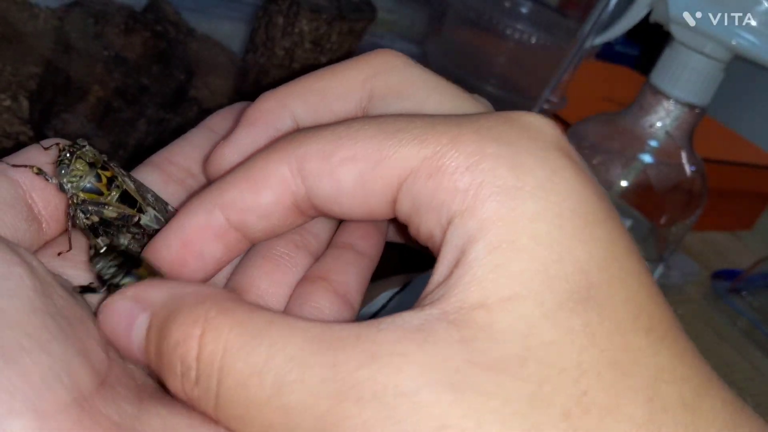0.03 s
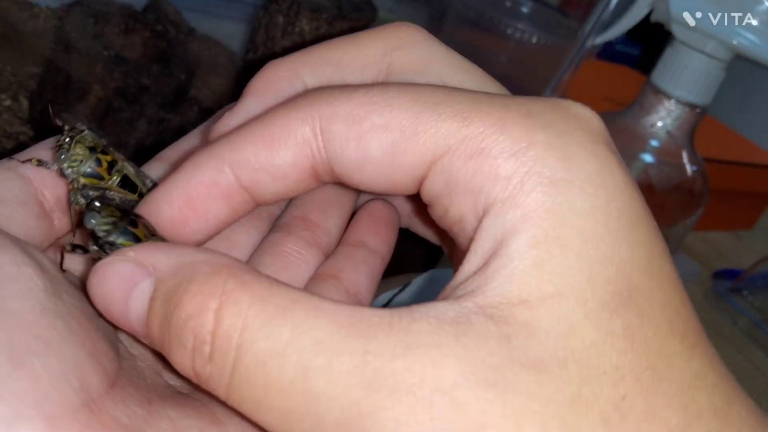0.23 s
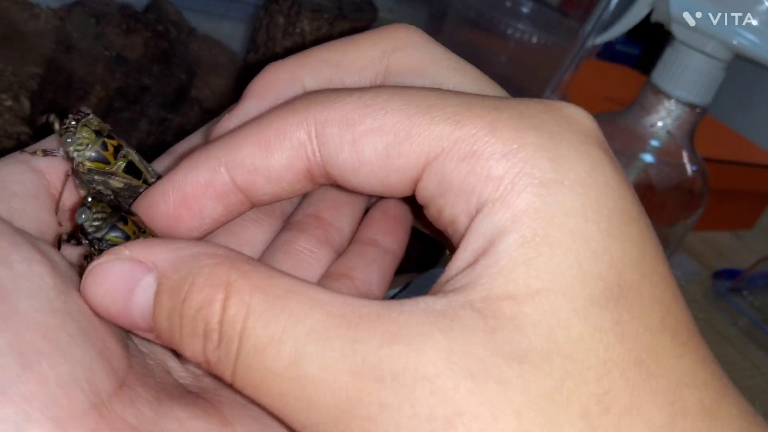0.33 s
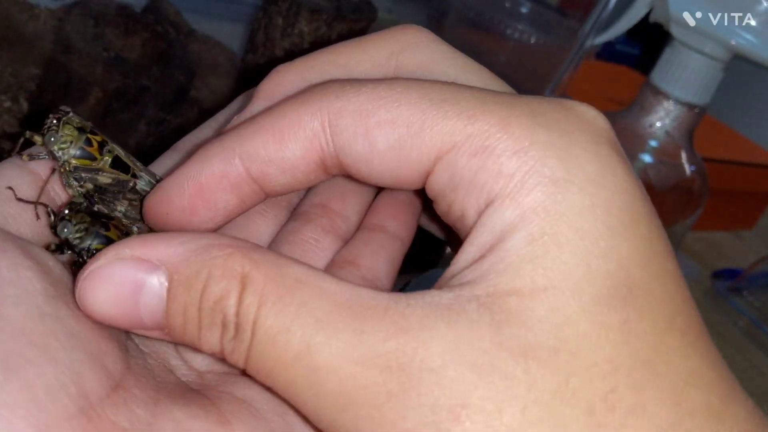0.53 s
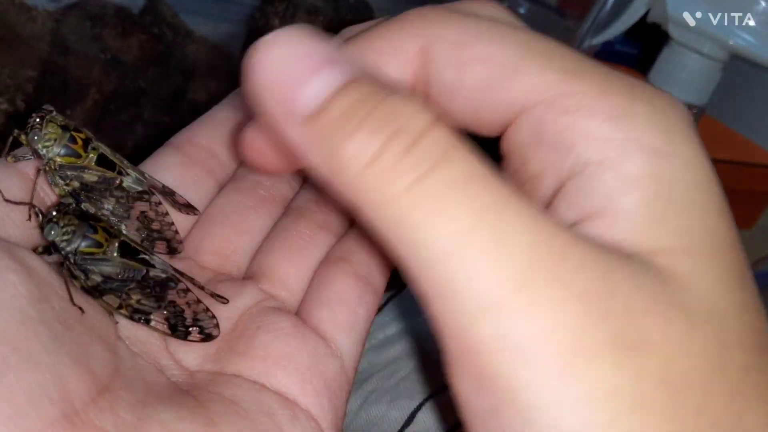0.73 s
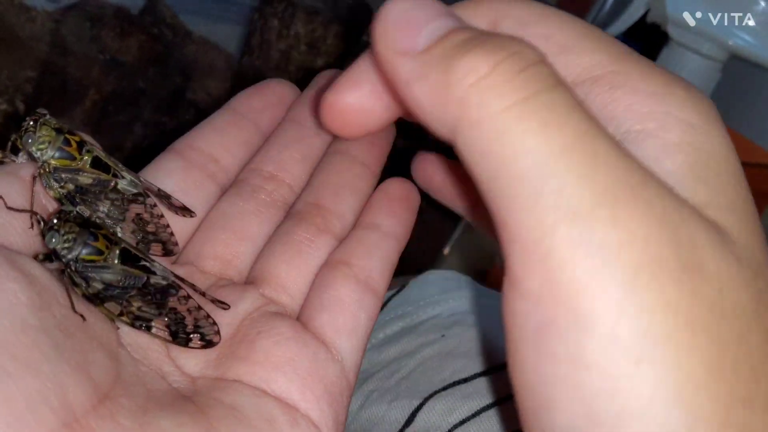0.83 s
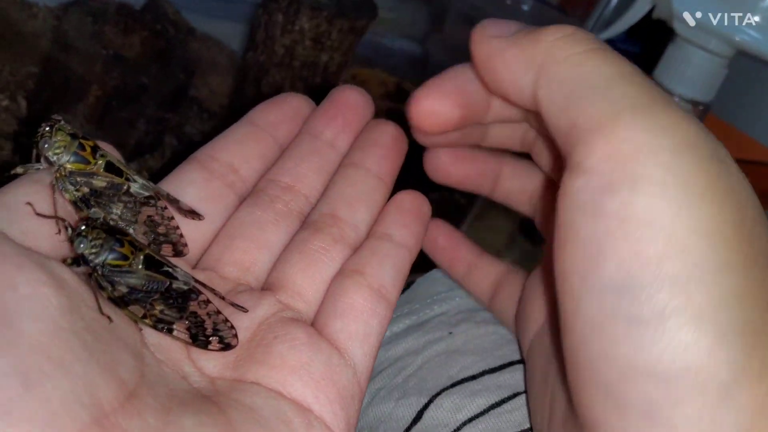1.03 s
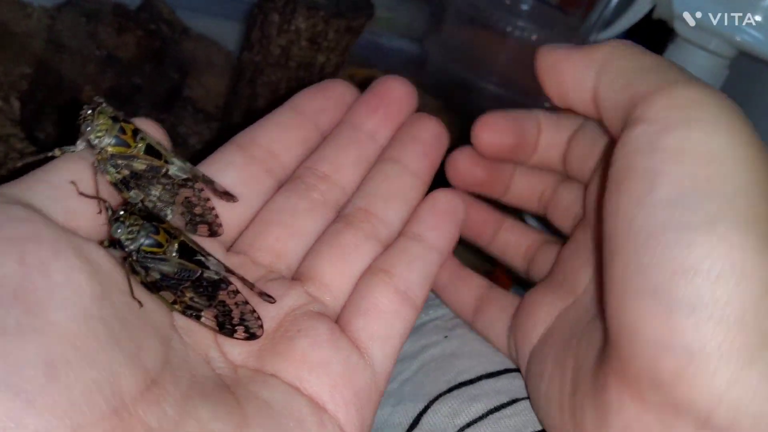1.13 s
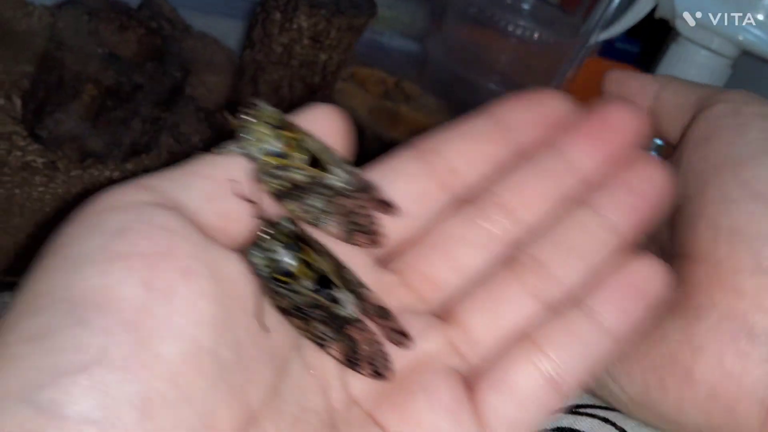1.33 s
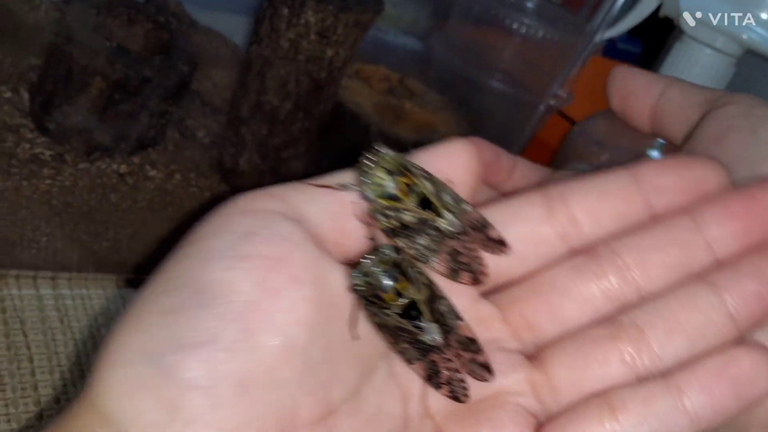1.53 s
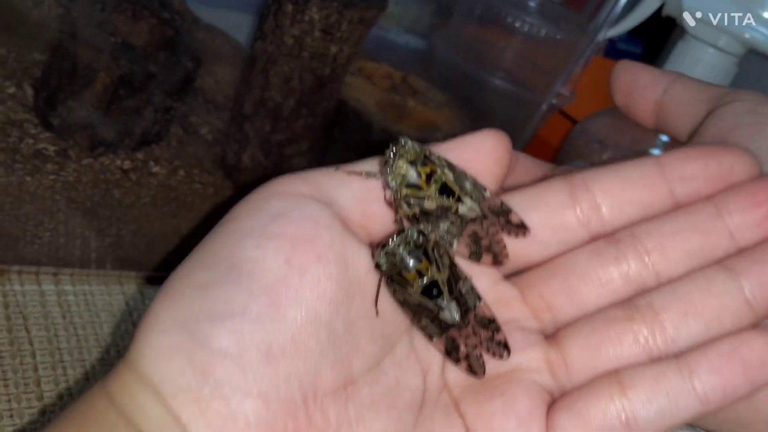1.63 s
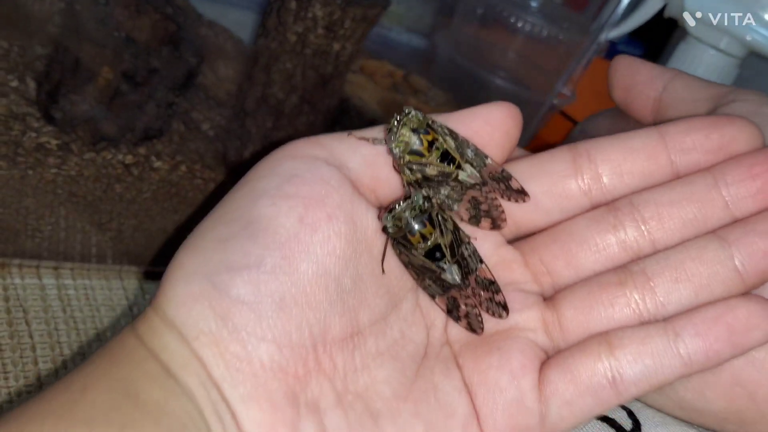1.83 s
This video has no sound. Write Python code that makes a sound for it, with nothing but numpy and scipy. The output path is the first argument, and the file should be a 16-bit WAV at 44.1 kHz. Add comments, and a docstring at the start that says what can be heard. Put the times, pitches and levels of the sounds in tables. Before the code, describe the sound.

A cicada gives short shrill chirps and one harsh buzz, close up over a low hum.

```python
"""One long harsh buzz among short chirps: a cicada held in the palm protests, close up in a small room.
Each muscle stroke buckles a tymbal and lets it spring back, two clicks that ring in the hollow abdomen.
A few faint ticks fall around the calls. Near the end a soft rubbing hiss swells on the left as the
hands move. Behind it all an appliance hums over the room's low rumble."""
import sys
import numpy as np
from scipy import signal
from scipy.fft import rfft, irfft
from scipy.io import wavfile
from scipy.ndimage import uniform_filter1d, minimum_filter1d

SR = 44100
rng = np.random.default_rng(int(sys.argv[2]) if len(sys.argv) > 2 else 0)


def transcribe(signal):
    """Save signal, clipped to [-1, 1], as a 16-bit WAV file at the path in sys.argv[1]."""
    frames = np.atleast_2d(signal).T
    limited = np.clip(frames, -1, 1)
    pcm = np.round(limited * 32767).astype(np.int16)
    wavfile.write(sys.argv[1], SR, pcm)


N = 83790
LEAD = SR // 10   # samples of pre-roll, so a chirp can start before time zero


def tymbal(times, level_db, tuning, bright_db, top_ring, max_strokes=80, size=300):
    """Two stereo clicks a stroke: each swells and dies in the body's modes as the ribs crackle."""
    # tymbal and abdomen modes: (pitch [Hz], decay [ms], buckling level [dB], spring-back level [dB])
    body_modes = [(4760, 0.25, -19.5, -20.5), (5533, 0.84, -10, -14), (6376, 0.47, 0, -10),
                  (7180, 0.65, -19.5, -5.5), (8690, 0.2, -10.5, 0), (9820, 0.74, -16, -8.5),
                  (12050, 0.45, -17, -24.5)]
    top_hz, top_ms, top_db = 15450, .5, -15   # an optional glassy ring of steady pitch
    rebound_s, rebound_spread_s, jitter_s, path_spread_s = .0013, .00027, .00012, .000016
    click_spread_db, mode_spread_db, pitch_spread = 1.3, 1.6, .017
    crackle_db, crackle_decay_s = -14, .001
    body_low_hz, thorax_band_hz, thorax_db = 4185, [1950, 3050], -26
    out, t = np.zeros((2, N + LEAD)), np.arange(size) / SR
    hz, decay_ms, *click_db = np.transpose(body_modes + [(top_hz, top_ms, top_db, top_db)])
    upper = np.arange(len(hz)) > np.argmax(click_db[0])   # these follow brightness, the rest tuning
    per_click = rng.standard_normal((max_strokes, 2, 2))
    per_mode = rng.standard_normal((max_strokes, 2, 4, len(hz), 1))
    crackle = rng.standard_normal((max_strokes, 2, 2, size))
    crackle *= from_db(crackle_db) * np.exp(-t / crackle_decay_s)
    age = t / (decay_ms[:, None] / 1000)
    envelope = age * np.exp(1 - age)
    for k, start in enumerate(times[:max_strokes]):
        start = start + jitter_s * per_click[k, 0, 0]
        rebound = rebound_s + rebound_spread_s * per_click[k, 1, 0]
        for click, delay in enumerate((0, rebound)):
            detune, strength, phase, path = per_mode[k, click]
            pitch = (hz * np.where(upper, 1, tuning[k]))[:, None] * (1 + pitch_spread * detune)
            pitch[-1] = top_hz
            gain = from_db(click_db[click] + mode_spread_db * strength[:, 0] + upper * bright_db)
            gain[-1] *= top_ring
            # each click leaves the body by a slightly different path
            ring = [gain @ (envelope * np.sin(2 * np.pi * pitch * (t - lag) + phase))
                    for lag in (0, path_spread_s * path)]
            level = from_db(level_db[k] + click_spread_db * per_click[k, click, 1])
            add(out, start + delay, level * (ring + crackle[k, click]))
    low_cut = signal.cheby1(10, 1, body_low_hz * np.mean(tuning), "high", fs=SR, output="sos")
    thorax = from_db(thorax_db) * cut(out, thorax_band_hz, "band")   # a weak low resonance
    return signal.sosfilt(low_cut, out + 1e-18) + thorax


def stroke_times(s, per_s):
    """The muscle fires once a cycle along a curve of stroke rates."""
    t = np.arange(s[0], s[-1], 1 / SR)
    cycles = np.cumsum(np.interp(t, s, per_s)) / SR
    return np.interp(np.arange(np.ceil(cycles[-1])), cycles, t)


def buzz():
    """The strokes speed up, hold and run down; the body's pitch rises with the effort."""
    # arc of the buzz: (time [s], stroke rate [1/s], level [dB], body tuning [ratio])
    effort = [(0.2363, 200, -12.5, 0.87), (.268, 273, -9, 0.85), (.31, 275, -8.5, 0.96),
              (.38, 298, -8, 0.94), (.412, 280, -10.5, 0.93), (0.436, 150, -14.5, 0.91)]
    s, per_s, db, tuning = np.transpose(effort)
    times = stroke_times(s, per_s)
    return tymbal(times, np.interp(times, s, db), np.interp(times, s, tuning), bright_db=0, top_ring=True)


def chirps():
    """The muscle slows and weakens over a handful of strokes, then adds one last soft stroke."""
    # chirps: (start [s], run length [s], last stroke after [s], level [dB], tuning [ratio], brightness [dB])
    calls = [(-.03, .02, 0.027, -1, .92, 0), (0.618, .025, .0285, -5, 1.011, -6),
             (1.167, .015, 0.021, -8, 1.023, -3.5), (1.5937, 0.018, 0.024, -5, 1.012, -1.5)]
    start_per_s, end_per_s, fade_db, last_stroke_db = 330, 225, -5, -5
    out = 0
    for start, length, last, db, tuning, bright_db in calls:
        run = stroke_times([start, start + length], [start_per_s, end_per_s])
        level_db = db + np.append(fade_db * ((run - start) / length) ** 2, last_stroke_db)
        times = np.append(run, start + last)
        out = out + tymbal(times, level_db, np.full(len(times), tuning), bright_db, top_ring=False)
    return out


def ticks(decay_s=.00047, low_cut_hz=4185, size=400):
    """Tiny crisp snaps, as of legs and wings against the fingers."""
    # snaps: (time [s], level [dB])
    snaps = [(.101, -33), (.1022, -25), (.1125, -51), (.1225, -38), (.792, -55.5), (1.123, -56)]
    out = np.zeros(N + LEAD)
    envelope = np.exp(-np.arange(size) / SR / decay_s)
    for s, db in snaps:
        add(out, s, from_db(db) * rng.standard_normal(size) * envelope)
    return cut(out, low_cut_hz, "high", order=8)


def hands_and_room(x):
    """Direct sound on the left, later and shaded on the right, with hand scatter and a short room tail."""
    # shading of the farther, right microphone: (frequency [Hz], gain [dB])
    shade = [(4000, -7), (5800, -4.5), (8500, -10), (11000, -7), (15500, -14)]
    # tone of the room's tail: (frequency [Hz], relative gain [dB])
    room_tone = [(4000, -1), (5200, -2), (6200, -0.5), (7600, 0.5), (9500, 5), (15000, 0)]
    scatter_db, scatter_decay_s, right_lag_s = -10, .0012, .0003478
    room_left_db, room_right_db, low_t60_s, treble_t60_s = -16, -19.5, .24, .19
    t = np.arange(SR) / SR
    scatter = rng.standard_normal((2, len(t))) * np.exp(-t / scatter_decay_s) * (t > .001)
    near = from_db(scatter_db) * rms_one(scatter) / np.sqrt(len(t))
    near[0, 0] += 1
    near[1] += np.sinc((t - right_lag_s) * SR)
    left, right = signal.fftconvolve(x, near, axes=1)[:, :N + LEAD]
    white = rng.standard_normal((2, len(t)))
    low_tail = cut(white, 5600, "low") * from_db(-60 * t / low_t60_s)
    treble_tail = cut(white[::-1], 9000, "high") * from_db(-60 * t / treble_t60_s)
    tail = colour(low_tail + treble_tail, room_tone) * (t > .004) * (t < t[-1] / 2)
    tail = rms_one(tail) / np.sqrt(len(t)) * from_db([[room_left_db], [room_right_db]])
    reverb = signal.fftconvolve(x, tail, axes=1)[:, :N + LEAD]
    return (np.array([left, colour(right, shade)]) + reverb)[:, LEAD:]


def rubbing(gain):
    """Friction hiss of hands by the left microphone, with one soft touch; mostly lows reach the right."""
    # tone of the friction: (frequency [Hz], relative density [dB])
    friction_tone = [(30, -23), (70, 2.5), (200, -3), (500, -2.5), (900, -2.5), (1700, 0), (3500, -5),
                     (8000, -8), (15500, -5)]
    # loss on the way to the right side: (frequency [Hz], gain [dB])
    right_loss = [(100, -9), (500, -5), (1500, -33.5), (15000, -31)]
    touch_s, touch_db, touch_decay_s, touch_band_hz = 1.525, -36, .004, [700, 2400]
    left, right = rms_one(colour(rng.standard_normal((2, N)), friction_tone)) * gain
    bass = signal.butter(2, 250, fs=SR, output="sos")
    right = right + signal.sosfiltfilt(bass, left - right)   # both sides share one bass waveform
    touch, t = np.zeros(N + LEAD), np.arange(SR // 20) / SR
    burst = rms_one(cut(rng.standard_normal(len(t)), touch_band_hz, "band", order=5))
    add(touch, touch_s, from_db(touch_db) * burst * np.exp(-t / touch_decay_s))
    return np.array([left + touch[LEAD:], colour(right, right_loss)])


def appliance_hum(swell):
    """Low tones that waver in level and phase; the deepest grows with the rubbing."""
    # hum tones: (pitch [Hz], resting rms level [dB])
    tones = [(65.5, -55.5), (141, -53.5), (425.3, -62.5), (533.5, -61)]
    waver_db, waver_rad, swell_db = 3.13, .067, 10.5
    t, hum = np.arange(N) / SR, 0
    for k, (hz, db) in enumerate(tones):
        level_db = db + waver_db * drift(8.1) + swell_db * swell * (k == 0)
        phase = 2 * np.pi * hz * t + waver_rad * drift(6)
        hum = hum + np.sqrt(2) * from_db(level_db) * np.sin(phase)
    return hum


def room_air(level_db=-51):
    """A low rumble near the centre under a faint, wide hiss."""
    # rumble and hiss: (frequency [Hz], relative density [dB])
    air_tone = [(25, -45), (45, -6.5), (62, 1), (125, -2.5), (190, -10), (280, -9.5), (430, -4.5),
                (650, -16), (1100, -25.5), (2100, -32.5), (2900, -43), (8000, -51), (16000, -45.5)]
    # likeness of left and right: (frequency [Hz], correlation [0-1])
    likeness = [(60, 0.68), (200, 0.96), (500, .6), (1500, .2), (5000, .01)]
    alike = at_hz(likeness, np.fft.rfftfreq(N, 1 / SR))
    mid, side = irfft(rfft(rng.standard_normal((2, N))) * np.sqrt([1 + alike, 1 - alike]), N)
    return from_db(level_db) * rms_one(colour(np.array([mid + side, mid - side]), air_tone))


def from_db(db):
    """Decibels to gain."""
    return 10 ** (np.asarray(db) / 20)


def rms_one(x):
    """Scale to unit rms."""
    return x / np.sqrt(np.mean(x ** 2) + 1e-20)


def at_hz(points, hz):
    """Read a table on a log-frequency axis."""
    f, v = np.transpose(points)
    return np.interp(np.log(np.maximum(hz, 1)), np.log(f), v)


def colour(x, points):
    """Equalise by a curve of (frequency [Hz], gain [dB])."""
    n = x.shape[-1]
    return irfft(rfft(x) * from_db(at_hz(points, np.fft.rfftfreq(n, 1 / SR))), n)


def cut(x, hz, kind, order=2):
    """Butterworth filter."""
    return signal.sosfilt(signal.butter(order, hz, kind, fs=SR, output="sos"), x + 1e-18)


def drift(rate_hz):
    """Slow random wander of unit rms."""
    return rms_one(cut(rng.standard_normal(N + SR), rate_hz, "low")[SR:])


def add(track, s, sound):
    """Mix a sound into a track that has pre-roll."""
    i = max(int(s * SR) + LEAD, 0)
    track[..., i:i + sound.shape[-1]] += sound[..., :track.shape[-1] - i]


def scene():
    """The cicada up front, the moving hands on the left, hum and room air behind."""
    # swell of the rubbing: (time [s], level [dB])
    rub_swell = [(0, -83), (1.25, -73), (1.421, -56), (1.491, -60.5), (1.551, -50), (1.658, -38.5),
                 (1.74, -35.5), (1.81, -31.5), (1.9, -31.5)]
    rub = from_db(np.interp(np.arange(N) / SR, *np.transpose(rub_swell)))
    cicada = hands_and_room(buzz() + chirps() + ticks())
    return cicada + rubbing(rub) + appliance_hum(rub / rub.max()) + room_air()


def record(dry):
    """A fast limiter holds down the loudest clicks; a steep low-pass trims the very top."""
    ceiling, window_s, cutoff_hz = .76, .003, 15900
    size = int(window_s * SR)
    allowed = ceiling / np.maximum(np.abs(dry).max(axis=0), ceiling)
    held = minimum_filter1d(allowed, size)
    gain = uniform_filter1d(uniform_filter1d(held, size // 2), size // 2)
    taps = signal.firwin(255, cutoff_hz, fs=SR, window=("kaiser", 8))
    return signal.fftconvolve(dry * gain, taps[None], mode="same", axes=1)


dry = scene()
out = record(dry)
transcribe(out)
```